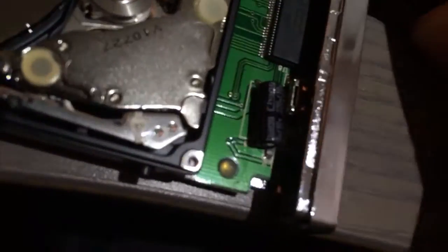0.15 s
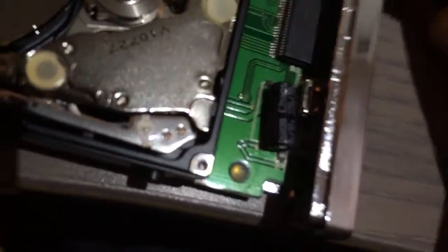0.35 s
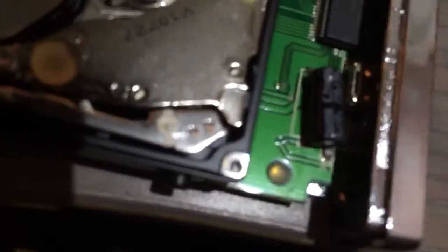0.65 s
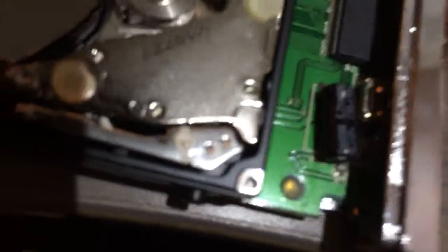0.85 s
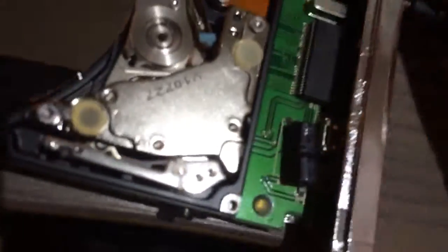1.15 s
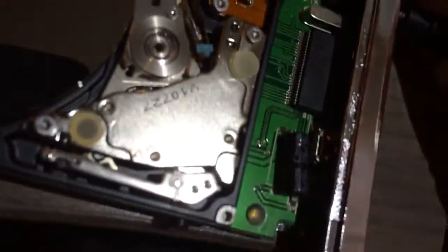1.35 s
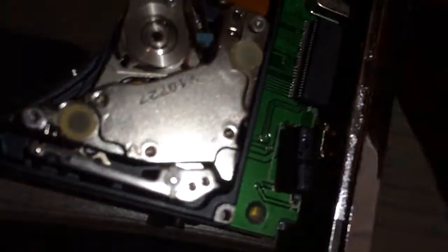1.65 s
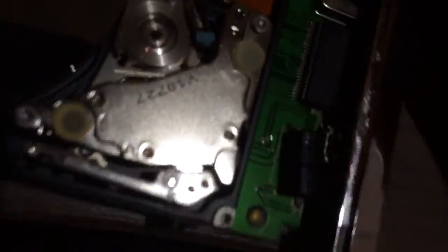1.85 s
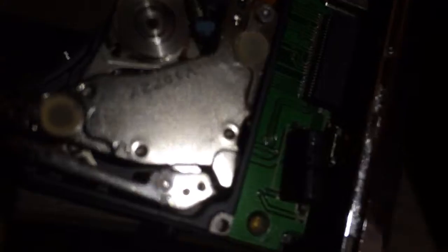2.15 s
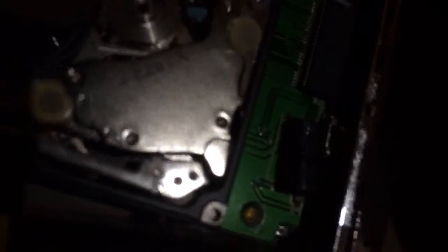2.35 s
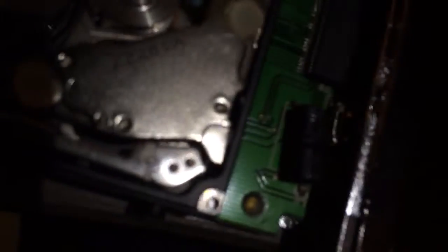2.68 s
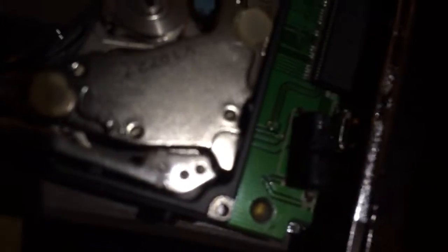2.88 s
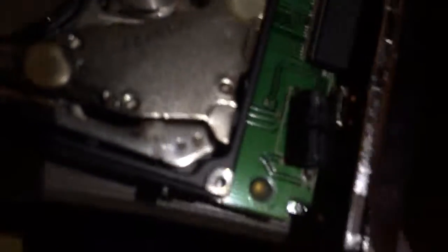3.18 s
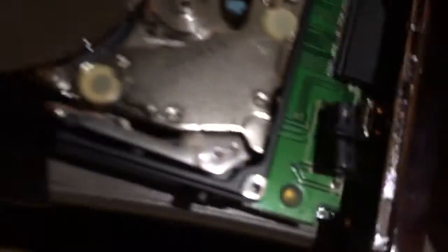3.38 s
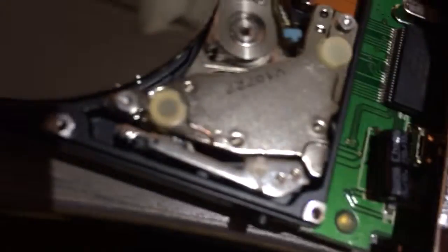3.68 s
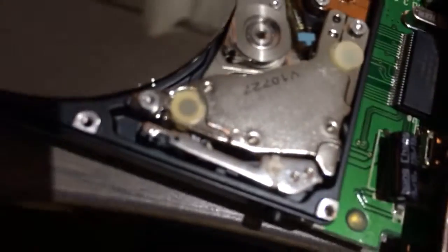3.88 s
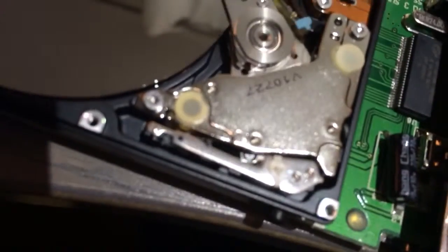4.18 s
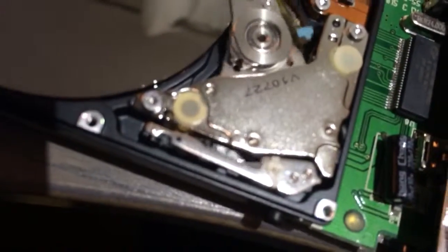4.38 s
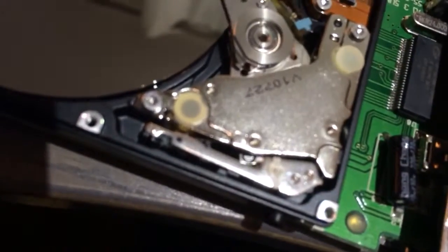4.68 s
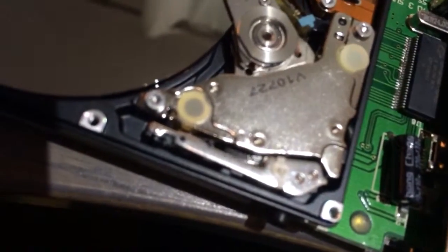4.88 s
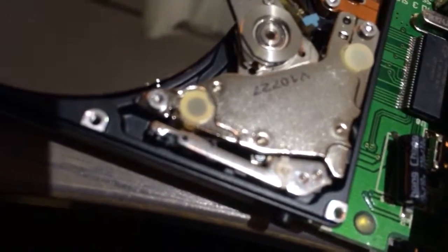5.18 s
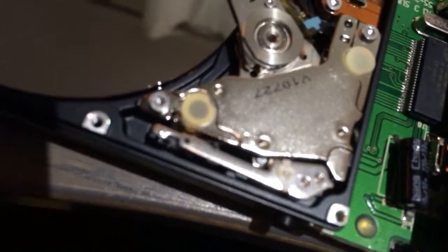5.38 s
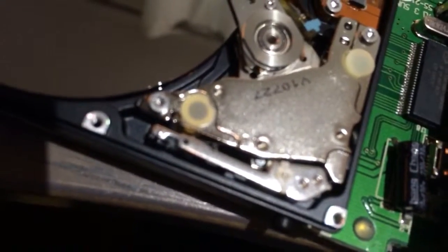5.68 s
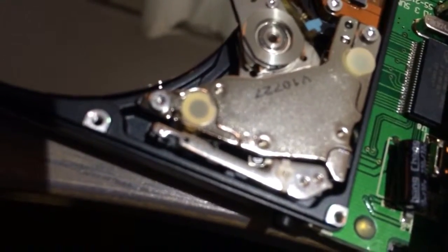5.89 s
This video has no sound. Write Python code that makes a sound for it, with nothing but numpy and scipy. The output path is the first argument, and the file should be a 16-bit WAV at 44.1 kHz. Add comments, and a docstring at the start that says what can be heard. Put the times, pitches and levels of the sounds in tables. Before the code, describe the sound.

Fingers rustle on an opened hard drive, a sharp clack, then the motor whines up to speed and the arm ticks in rattling bursts.

```python
"""A quiet room: an opened laptop hard drive lies on a table, close to a phone microphone.
Fingers rustle on it as grainy filtered noise, and the head arm knocks its stops as short contacts that ring modes.
The spindle motor steps up to speed: torque ripple and switching edges ring the base into a rising whine.
Then the arm unlatches and seeks in rattles of ticks, over steady motor tones and the noise of air
dragged by the platter."""
import sys
import numpy as np
from scipy import signal
from scipy.fft import rfft, irfft
from scipy.io import wavfile

SR = 44100
rng = np.random.default_rng(int(sys.argv[2]) if len(sys.argv) > 2 else 0)


def file_out(sig):
    """Save sig as 16-bit WAV at sys.argv[1]."""
    # one column per channel
    cols = np.atleast_2d(sig).T
    # limit, then scale
    lim = np.clip(cols, -1, 1)
    pcm = np.round(lim * 32767).astype(np.int16)
    wavfile.write(sys.argv[1], SR, pcm)


N = 266231
TIME = np.arange(N) / SR   # seconds

SWITCHES_PER_TURN = 36   # winding switches in one turn of the platter
START_S, LOCK_S = 2.9014, 3.972   # the run-up begins; the speed loop takes over (s)
FULL_HZ = 2524.3   # winding switches per second at full speed

# Resonances of the drive's base. Each row: centre in Hz, width in Hz, level in dB.
BASE = [(1750, 580, -18), (2224, 360, 0), (2327, 360, -1), (3200, 250, -8), (4270, 180, 0),
        (5140, 130, -3.5), (6080, 440, -5), (7260, 110, -4), (7710, 240, -9), (8300, 78, -8.5),
        (8800, 360, -9.5), (9910, 940, -11.5), (10230, 310, -3.5), (11000, 540, -10.5), (12360, 750, -11),
        (13840, 1100, -10.5)]
# Colour of skin sliding on metal, also of buzzing loose parts. Each row: frequency in Hz, relative level in dB per Hz.
SLIDE = [(530, -54), (900, -11.5), (1350, -13), (1660, -10.5), (2460, -7), (3000, -8.5), (6300, -11.5),
         (7100, -8.5), (9000, -13), (15200, -21.5)]


def from_db(db):
    """Gain for a level."""
    return 10 ** (np.asarray(db) / 20)


def rms_one(x):
    """Scale to rms 1."""
    return x / np.sqrt(np.mean(x ** 2) + 1e-20)


def in_time(points):
    """Straight lines through (seconds, value) points, sample by sample."""
    seconds, values = np.transpose(points)
    return np.interp(TIME, seconds, values)


def window(start, end, edge):
    """1 between two times, with straight edges outside them."""
    return in_time([(start - edge, 0), (start, 1), (end, 1), (end + edge, 0)])


def drift(rate_hz):
    """Slow random wander of rms 1: two-pole smoothed noise, drawn every 40 samples."""
    r = np.exp(-2 * np.pi * rate_hz * 40 / SR)
    noise = rng.standard_normal(N // 40 + 2002)
    slow = signal.lfilter([1], [1, -2 * r, r * r], noise)[2000:]   # the filter's start is dropped
    return np.interp(np.arange(N) / 40, np.arange(len(slow)), rms_one(slow))


def coloured(spectrum):
    """Noise of rms 1 whose spectrum follows (Hz, dB per Hz) points, joined along log frequency."""
    hz, level_db = np.transpose(spectrum)
    grid = np.arange(1, N // 2 + 2) * SR / N
    gain = from_db(np.interp(np.log(grid), np.log(hz), level_db))
    return rms_one(irfft(rfft(rng.standard_normal(N)) * gain, N))


def resonance(x, hz, width_hz):
    """Two-pole peak of gain 1."""
    r = np.exp(-np.pi * width_hz / SR)
    poles = [1, -2 * r * np.cos(2 * np.pi * hz / SR), r * r]
    return signal.lfilter([(1 - r * r) / 2, 0, (r * r - 1) / 2], poles, x + 1e-18)


def body(x, modes):
    """Parallel resonances of alternating sign."""
    return sum((-1) ** k * from_db(db) * resonance(x, hz, width_hz)
               for k, (hz, width_hz, db) in enumerate(modes))


def ring(x, hz, t60):
    """A unit click sets a sine of height 1 ringing, down 60 dB after t60 seconds."""
    r, w = from_db(-60 / (t60 * SR)), 2 * np.pi * hz / SR
    return signal.lfilter([0, np.sin(w)], [1, -2 * r * np.cos(w), r * r], x + 1e-18)


def impulses(times, sizes):
    """Band-limited clicks placed between samples."""
    at, out = np.asarray(times) * SR, np.zeros(N + 64)
    taps = np.floor(at)[:, None] + np.arange(-16, 17)
    away = taps - at[:, None]
    clicks = np.sinc(.9 * away) * np.cos(np.pi * away / 34) ** 2
    np.add.at(out, taps.astype(int), np.asarray(sizes)[:, None] * clicks)
    return out[:N]


def little_bass(x, above_hz):
    """A small body radiates little below a limit."""
    return signal.sosfilt(signal.butter(4, above_hz, "high", fs=SR, output="sos"), x)


def struck(hits, modes, spread_db, flex=0):
    """Each hit is a short rough contact in which every mode builds up to a strength of its own."""
    out, after = np.zeros(N), np.arange(800)
    count = len(modes)
    luck = rng.standard_normal((len(hits), 2 * count + len(after)))
    for k, (hz, level_db, t60) in enumerate(modes):
        wave = np.exp(2j * np.pi * hz * after / SR)
        force = np.zeros(N + len(after))
        for (s, peak_db, tilt, base_db, contact_ms), row in zip(hits, luck):
            contact_samples = contact_ms * SR / 1000
            phase = after / contact_samples
            # a steady push at the mode's own frequency, in random phase, plus noise
            push = np.real(wave * np.exp(10j * row[count + k])) / np.sqrt(contact_samples)
            contact = (push + .75 * row[2 * count:]) * np.sqrt(phase) * np.exp(-phase)
            # what the base does not take rings the arm's flexure; -8 dB is the even share
            flex_db = flex * (-8 - base_db) * (3300 < hz < 3800)
            gain_db = peak_db + level_db + tilt * np.log2(hz / 4000) + spread_db * row[k]
            gain = from_db(gain_db + base_db * (hz < 2700) + flex_db)   # the base share acts below 2700 Hz
            # divide by the contact's pull on this mode, so that the gain sets the ring
            strength = np.hypot(abs(contact @ wave), np.linalg.norm(contact) / 2)
            force[round(s * SR) + after] += gain * contact / strength
        out += (-1) ** k * ring(force[:N], hz, t60)
    return little_bass(out, 1800)


def room(x):
    """Diffuse echoes: noise that dies band by band, fading in over the first 1.6 ms."""
    # Decay of the room. Each row: band in Hz, time to fall 60 dB in seconds.
    band_decays = [(300, 0.48), (2000, 0.28), (6000, 0.046), (14000, 0.019)]
    t, tail = np.arange(SR // 2) / SR, 0
    for hz, t60 in band_decays:
        band = signal.butter(1, [hz / 2.2, hz * 1.5], "band", fs=SR, output="sos")
        tail = tail + signal.sosfilt(band, rng.standard_normal(len(t))) * from_db(-60 * t / t60)
    tail = tail * np.clip(t / 0.0016, 0, 1)
    return signal.fftconvolve(x, tail / np.sqrt(np.sum(tail ** 2)))[:N]


def room_tone():
    """Broad rumble and hiss, with a few room resonances standing out."""
    # Colour of the empty room. Each row: frequency in Hz, relative level in dB per Hz.
    floor_colour = [(12, -61), (25, -20.5), (210, -4), (377, -15), (678, -20), (1220, -24.5), (2320, -31),
                    (15200, -39), (15450, -75.5)]
    # Room resonances in the rumble. Each row: centre in Hz, width of each of two passes in Hz, level in dB rms.
    rumble_peaks = [(60.5, 22, -76), (125.7, 42, -71), (164.6, 16.6, -67.5), (210.5, 38, -68.5),
                    (286.3, 32, -73), (313.2, 11.8, -72)]
    noise = rng.standard_normal(N)
    hum = 0
    for hz, width_hz, db in rumble_peaks:
        peak = resonance(resonance(noise, hz, width_hz), hz, width_hz)
        hum = hum + from_db(db) * rms_one(peak)
    return from_db(-63.5) * coloured(floor_colour) + hum


def platter_air(switch_hz):
    """Windage: air dragged by the platter hisses, growing steeply with speed."""
    # Colour of the windage. Each row: frequency in Hz, relative level in dB per Hz.
    air_colour = [(300, 3), (600, -2.5), (2000, -2), (4300, -1.5), (5500, -5), (8000, -12), (11000, -10),
                  (13000, -30), (15200, -22), (15450, -60)]
    level = from_db(-64 + 0.07 * drift(25.0))   # at full speed
    return level * (switch_hz / switch_hz[-1]) ** 2.4 * coloured(air_colour)


def running_tones(switch_hz):
    """Once the speed loop takes over, multiples of the turning rate remain, with a once-a-turn platter shake."""
    # Tones at full speed, set to the nearest multiple of the turning rate. Each row: frequency in Hz, level in dB rms.
    tones = [(2525, -77), (3575, -75), (5050, -72), (7574, -83), (8414, -97), (8834, -85), (10099, -79),
             (10519, -73), (10799, -83), (10939, -72), (11219, -80), (11359, -79), (12199, -87),
             (12618, -84), (13044, -86), (13464, -86), (13884, -71), (14303, -86), (15143, -81)]
    # Tones that swell for a while. Each row: frequency in Hz, start in seconds, end in seconds, added level in dB rms.
    swells = [(10939, 3.96, 3.995, -61), (10939, 4.0, 4.22, -68.5), (10939, 4.225, 4.245, -57.5),
              (10939, 4.505, 4.58, -59.5), (10939, 4.955, 5.0, -63), (8414, 5.6, 5.87, -78)]
    turns = 2 * np.pi * np.cumsum(switch_hz) / SR / SWITCHES_PER_TURN   # radians
    turn_hz = FULL_HZ / SWITCHES_PER_TURN
    out = np.zeros(N)
    for hz, db in tones:
        multiple = round(hz / turn_hz)
        level = from_db(db + 0.19 * drift(24))
        for swell_hz, start, end, swell_db in swells:
            if round(swell_hz / turn_hz) == multiple:
                level = level + from_db(swell_db) * window(start, end, 0.0091)
        out += np.sqrt(2) * level * np.sin(multiple * turns + rng.uniform(0, 2 * np.pi))
    shake = from_db(-72 + 1.1 * drift(2.7)) * (switch_hz / FULL_HZ) ** 2 * np.sin(turns)
    return window(LOCK_S, N / SR, 0.12) * out + shake   # the tones fade in just before the lock


def fingers():
    """Skin sliding on metal: grainy hiss that swells and fades with each stroke, partly through the base."""
    # Strokes of the fingers. Each row: middle in seconds, level in dB, approximate length in ms.
    stroke_list = [(0.62, -72, 195), (0.735, -71, 62), (0.852, -71, 19), (0.928, -64, 61),
                   (1.034, -60.5, 44), (1.141, -63, 18), (1.196, -66, 79), (1.433, -70.5, 36),
                   (1.595, -64, 52), (1.651, -67, 32), (1.77, -69.5, 31), (1.8608, -62.5, 4),
                   (1.985, -56.5, 53), (2.035, -70, 38), (2.39, -57, 51), (2.446, -65, 33),
                   (2.524, -64, 49)]
    grain = from_db(3.0 * drift(240))
    strokes = 0
    for middle_s, db, ms in stroke_list:
        away = (TIME - middle_s) * 1000 / (0.51 * ms)
        strokes = strokes + from_db(db) * np.exp(-np.abs(away) ** 3.2)
    hiss = grain * coloured(SLIDE)
    return strokes * rms_one(rms_one(hiss) + .3 * rms_one(body(hiss, BASE)))


def knocks():
    """Arm blows on its stops and latch ring the drive; some shake the table, the first of these also loose parts."""
    # Blows on the end stop. Each row: start in seconds, strength in dB, brightness in dB per octave,
    # share passed to the base in dB, contact time constant in ms.
    stop_blows = [(2.6302, -12.5, 5.5, 5.5, 0.91), (3.3768, -41.5, -13.5, -5, 0.56),
                  (3.4025, -50.5, -10, -1.5, 1.2)]
    # The arm tugging at its latch, later leaving it. Each row: start in seconds, strength in dB,
    # brightness in dB per octave, share passed to the base in dB.
    latch_blows = [(2.5496, -56, 0, -2), (2.5591, -27, -0.5, -6), (2.59, -28.5, 6, 5),
                   (2.6976, -29.5, 0.5, -6), (2.7283, -29.5, 4, 1.5), (4.1175, -27, 0.5, -2.5),
                   (4.1278, -31.5, -1, -3.5), (4.154, -41.5, -1, -6), (4.173, -45.5, -5, -2),
                   (4.1801, -32.5, -3, -9), (4.183, -29.5, 3, 1.5), (4.1877, -27.5, -2.5, -3.5),
                   (4.224, -56.5, 27.5, 0)]
    # Modes of the stop, then of the latch. Each row: frequency in Hz, relative level in dB, 60 dB decay in seconds.
    stop_modes = [(1594, -27, 0.088), (1850, -18, 0.06), (2223, -11.5, 0.031), (2380, -17, 0.099),
                  (2460, -2, 0.014), (3330, 0, 0.0074), (4036, -3, 0.021), (4450, -4, 0.0094),
                  (5130, 2, 0.011), (6200, 3, 0.0063), (7040, -11, 0.014), (7660, -8.5, .008),
                  (8750, -12, 0.012), (10050, -10, 0.0065), (11850, -0.5, 0.0031), (12000, -12.5, 0.0071),
                  (13800, -14.5, .006)]
    latch_modes = [(1375, -18.5, 0.09), (1560, -15, 0.039), (1838, -9.5, 0.031), (2195, -6.5, 0.053),
                   (2506, 6.5, 0.019), (3400, -6, 0.011), (4090, 3, 0.012), (5003, 2, 0.014),
                   (6260, -6, 0.0086), (7204, -5.5, 0.0063), (8790, -8, 0.0052), (11300, -16, 0.004),
                   (13500, -20.5, .004)]
    # Blows that also move the table. Each row: start in seconds, strength in dB, brightness in dB per octave.
    thumps = [(2.6309, 1, 1.5), (3.3777, -16, -4)]
    # Modes of the table. Each row: frequency in Hz, level in dB, 60 dB decay in seconds.
    table_modes = [(65, -56.5, 0.55), (212, -51, 0.27), (930, -47, 0.062), (1160, -29.5, 0.024),
                   (1565, -30, 0.028)]
    latch_contact_ms = 1.28
    blows = struck(stop_blows, stop_modes, spread_db=3.0)
    latch_hits = [(*row, latch_contact_ms) for row in latch_blows]
    blows = blows + struck(latch_hits, latch_modes, spread_db=3.5)
    thump_s, thump_db, tilt = np.transpose(thumps)
    since = TIME - thump_s[0]
    rattle_level = (since > 0) * from_db(-32.5 - 60 * np.abs(since) / 0.14)   # dies 60 dB in 0.14 s
    rattle = rattle_level * coloured(SLIDE)
    table = 0
    for hz, db, t60 in table_modes:
        sizes = from_db(thump_db + db + tilt * np.log2(hz / 1000))
        table = table + ring(impulses(thump_s, sizes), hz, t60)
    return blows + rattle + table


def seeks():
    """Ticks of the arm starting and stopping, with a rough shake of its modes while it sweeps."""
    # Ticks of the seeking arm. Each row: start in seconds, strength in dB, share passed to the base in dB.
    tick_list = [(4.2495, -42, -6), (4.2586, -43, -30), (4.3445, -39.5, -15.5), (4.389, -51.5, -17),
                 (4.4096, -50, -21), (4.45, -39.5, -30), (4.4911, -45, -24), (4.496, -43, -4),
                 (4.5005, -46, -15), (4.5101, -49, 9), (4.5205, -43, 5), (4.5323, -41.5, 0.5),
                 (4.5446, -44, -1), (4.5508, -42, -31), (4.559, -44, -13), (4.5683, -42, -17),
                 (4.5765, -46, -21), (4.5866, -38.5, -19), (4.5955, -37, -24), (4.605, -42, -24),
                 (4.6145, -40, -20), (4.6225, -41, -13), (4.6295, -36, -8), (4.64, -37.5, -13),
                 (4.649, -37.5, -14), (4.6582, -37, -11), (4.6658, -35, -14), (4.6754, -30, -7),
                 (4.6861, -36, -2.5), (4.6915, -39, -27), (4.697, -45, -3), (4.7597, -55, -26),
                 (4.8123, -51.5, -19), (4.8663, -49.5, -18), (4.8705, -60, -23), (4.884, -51, -30),
                 (4.897, -51, -24), (4.9218, -40.5, -36), (4.9385, -42, -13), (4.9445, -43, -6),
                 (4.9493, -47, -15), (4.9566, -38.5, 2.5), (4.9791, -44, 4.5), (5.003, -44, -15),
                 (5.008, -57, -22), (5.0144, -40, -16), (5.0235, -56, -25), (5.0685, -49, -23),
                 (5.0943, -46, -10), (5.1257, -54, -22), (5.1541, -54, -19), (5.885, -41, -22)]
    # Modes of the arm. Each row: frequency in Hz, relative level in dB, 60 dB decay in seconds.
    arm_modes = [(2150, -6, 0.015), (2478, 2.5, 0.035), (2950, -8, 0.03), (3560, -6, 0.032),
                 (4250, 1.5, 0.014), (4640, -3, 0.012), (5040, -1, 0.012), (6400, -5, 0.009),
                 (8700, -3, 0.0075), (9400, -14, 0.0048), (11600, -11.5, 0.0083)]
    # Sweeps of the arm. Each row: start in seconds, end in seconds, first level in dB, last level in dB.
    sweeps = [(4.212, 4.261, -60, -56), (4.5, 4.698, -59, -54), (4.874, 5.013, -57, -57)]
    contact_ms = 1.47   # time constant
    hits = [(s, db, 0, base_db, contact_ms) for s, db, base_db in tick_list]
    ticks = struck(hits, arm_modes, spread_db=2.5, flex=.5)
    noise = rng.standard_normal(N) * from_db(2.4 * drift(70))
    shake = rms_one(sum(from_db(db - 11.0 * (hz < 2700)) * ring(noise, hz, t60) for hz, db, t60 in arm_modes))
    sweeping = 0
    for start, end, first_db, last_db in sweeps:
        level = from_db(in_time([(start, first_db), (end, last_db)]))
        sweeping = sweeping + window(start, end, .006) * level
    soft = signal.butter(2, [1600, 11000], "band", fs=SR, output="sos")   # a soft contact dulls the top; little sounds below 1.6 kHz
    return signal.sosfilt(soft, ticks + sweeping * shake)


def speed():
    """Winding switches per second: climb toward a free speed never reached, then settle under the speed loop."""
    free_hz, climb_s, climb_shape, settle_s = 3276.5, .7395, 1.0965, .05
    since = np.clip(TIME - START_S, 0, LOCK_S - START_S)
    climb = free_hz * (1 - np.exp(-(since / climb_s) ** climb_shape))
    settling = FULL_HZ + (climb - FULL_HZ) * np.exp(-np.abs(TIME - LOCK_S) / settle_s)
    return np.where(TIME < LOCK_S, climb, settling)


def drive():
    """Run-up current in dB: grows slowly, falls away near full speed."""
    growth_db_per_s, cut_s, cut_db_per_s = 3, 3.955, 600
    return -54 + growth_db_per_s * (TIME - START_S) - cut_db_per_s * np.maximum(TIME - cut_s, 0)


def motor(switch_hz, drive_db):
    """Torque ripple and switching edges shake the base; unequal windings rock the platter between the main tones."""
    # Lone winding switches while the rotor is lined up. Each row: start in seconds, strength in dB.
    nudge_list = [(2.761, -31), (2.778, -34.5), (2.793, -31.5), (2.806, -33), (2.8202, -32.5),
                  (2.8915, -31.5)]
    # Torque ripple at 1, 2, 3 .. times the switching rate. Each entry: relative level in dB.
    torque_db = [-10.5, -2, 3, 4.5, 3, -0.5, -3, -31]
    # Unequal pull of the six switching steps. Each entry: relative strength in dB.
    balance_db = [-5, -5, 3, -2, -0.5, 4.5]
    # Resonances of the rocked platter. Each row: centre in Hz, width in Hz, level in dB.
    platter_modes = [(6030, 910, -18), (8700, 390, -7.5), (10690, 165, 4), (10830, 140, -1),
                     (11200, 180, -8), (12500, 570, -27)]

    count = np.cumsum(switch_hz) / SR   # winding switches so far
    steps = np.arange(1, int(count[int(4.2 * SR)]))
    times = np.interp(steps, count, TIME)
    at = (times * SR).astype(int)
    size = from_db(drive_db[at] + 23.5 + rng.normal(0, 0.73, len(steps)))
    nudge_s, nudge_db = np.transpose(nudge_list)
    nudges = impulses(nudge_s, from_db(nudge_db))

    per_step = 20 * from_db(drive_db + 1.5 * drift(38)) * switch_hz / SR * (count < steps[-1])
    ripple = 0
    for k, db in enumerate(torque_db, start=1):
        level = from_db(db + 3.5 * drift(12))   # each ripple tone swells and fades by itself
        in_band = k * switch_hz < .4 * SR
        ripple = ripple + level * np.cos(2 * np.pi * k * count) * in_band

    uneven = rms_one(from_db(balance_db) / np.mean(from_db(balance_db)) - 1)
    rock_level = from_db(-7 + 4 * drift(14))   # the rocking comes and goes
    twice_a_turn = 1 + .3 * np.cos(4 * np.pi * count / SWITCHES_PER_TURN)
    rocking = rock_level * twice_a_turn * impulses(times, size * uneven[steps % len(uneven)])

    # the slow rotor is kicked hard and unevenly: edges come a few percent of a step early or late
    harsh = np.minimum(1, 650 / switch_hz[at]) ** 1.67
    slip = .04 * harsh * rng.standard_normal(len(steps))
    edges = from_db(1.5) * impulses(np.interp(steps + slip, count, TIME), size * harsh)

    # a dull, rough pull that grows steeply toward full speed
    dull = signal.sosfilt(signal.butter(3, 5600, fs=SR, output="sos"), rng.standard_normal(N))
    shudder = from_db(drive_db + 5.5) * (switch_hz / FULL_HZ) ** 15 * dull

    push = per_step * ripple + edges + nudges + from_db(-14) * rocking + shudder
    whine = little_bass(body(push, BASE) + body(rocking + nudges, platter_modes), 1750)
    # the whine is low-passed at 15.2 kHz
    return signal.sosfilt(signal.butter(12, 15200, fs=SR, output="sos"), whine)


def scene():
    """Drive and fingers close by, a little room, the floor."""
    switch_hz = speed()
    near = motor(switch_hz, drive()) + knocks() + seeks() + fingers()
    steady = running_tones(switch_hz) + platter_air(switch_hz) + room_tone()
    return (near + from_db(-21.5) * room(near) + steady)[None]


def record(dry):
    """The top is cut, down 70 dB from 16.46 kHz."""
    return signal.sosfilt(signal.cheby2(14, 70, 16460, fs=SR, output="sos"), dry)


dry = scene()
out = record(dry)
file_out(out)
```